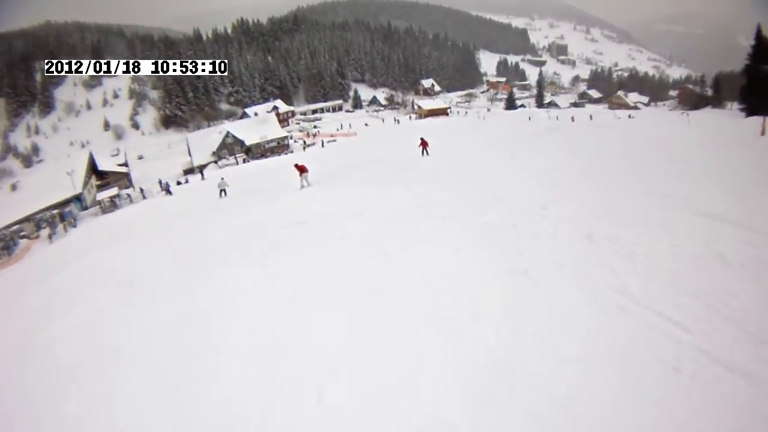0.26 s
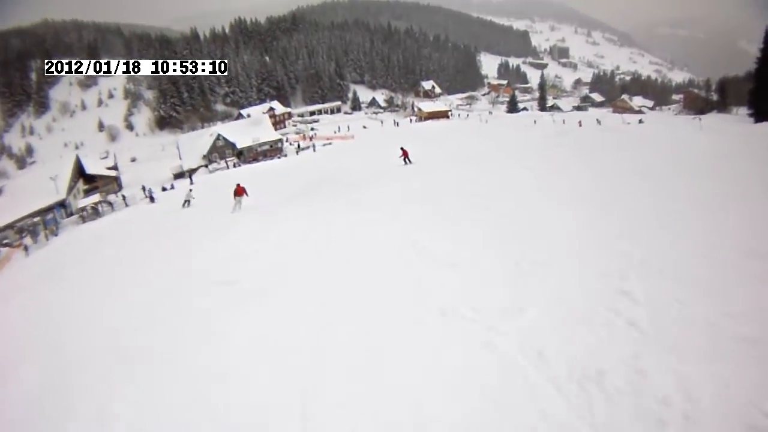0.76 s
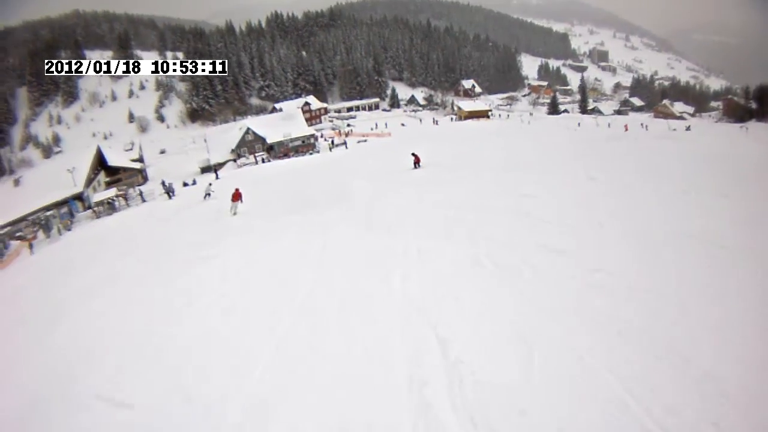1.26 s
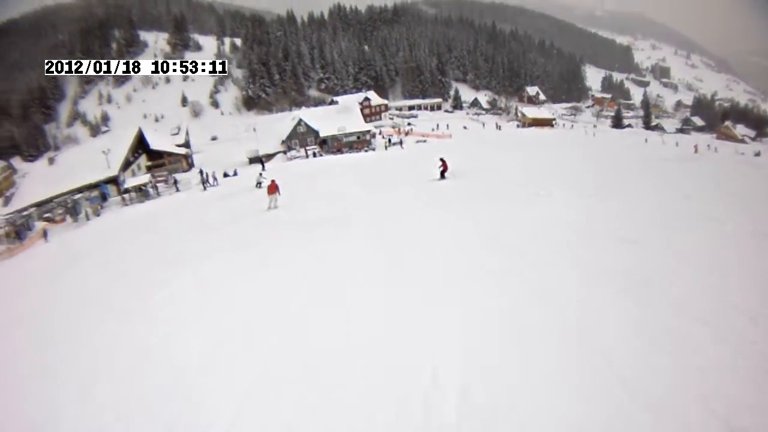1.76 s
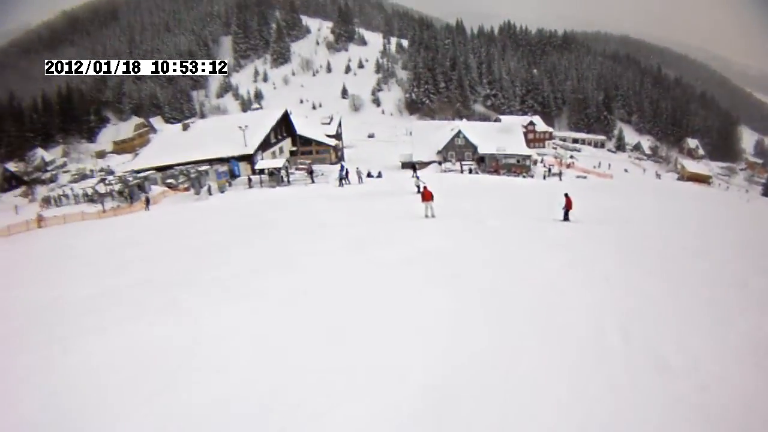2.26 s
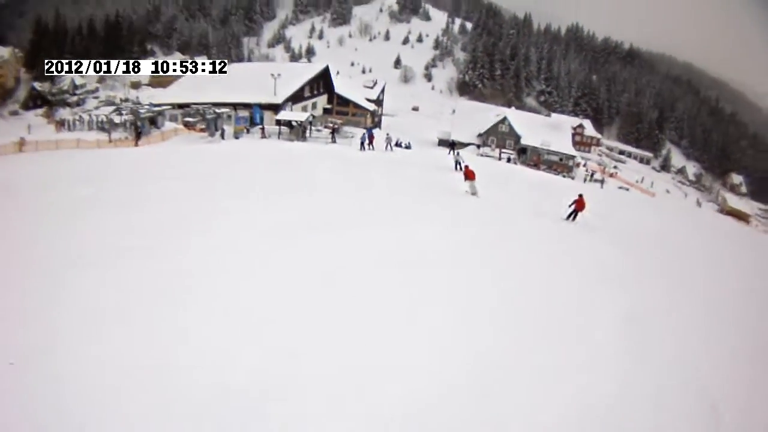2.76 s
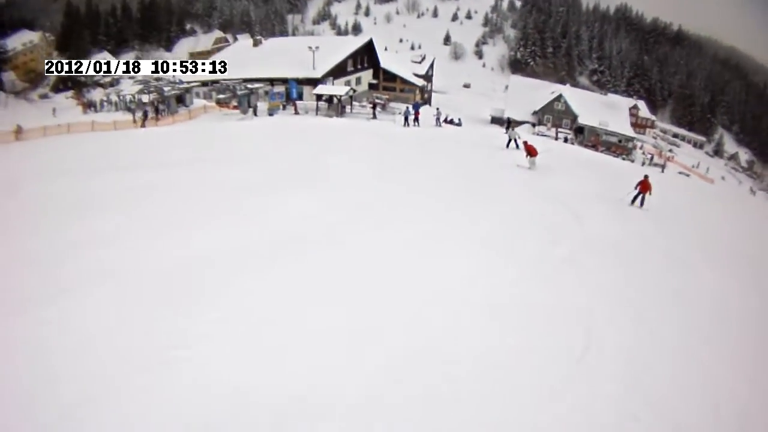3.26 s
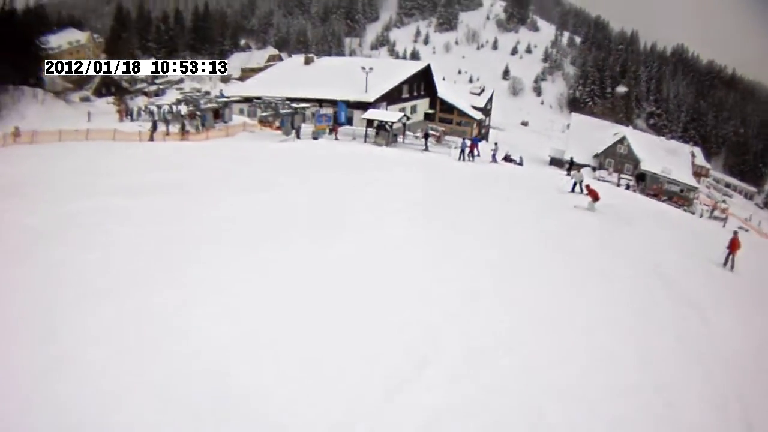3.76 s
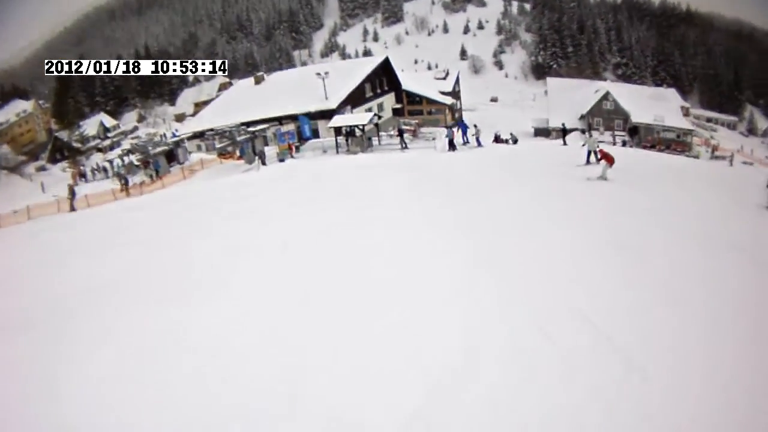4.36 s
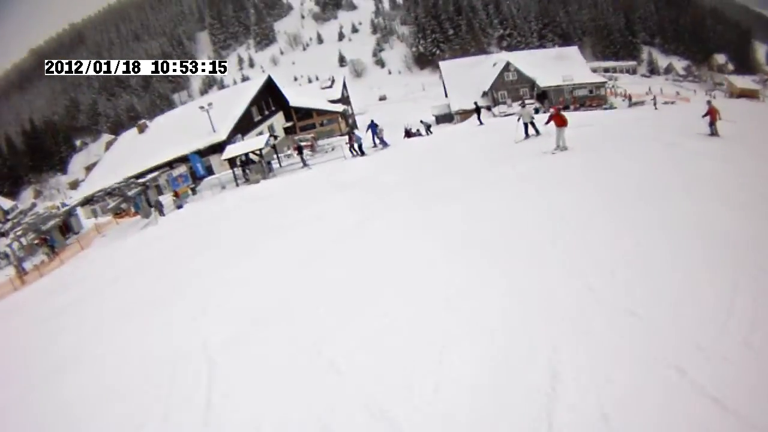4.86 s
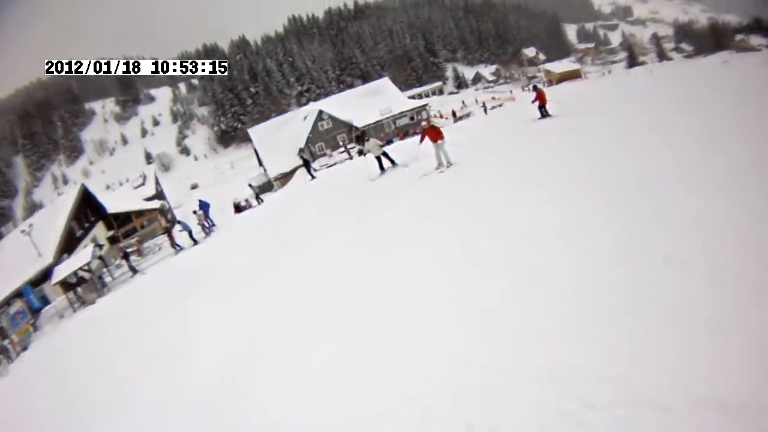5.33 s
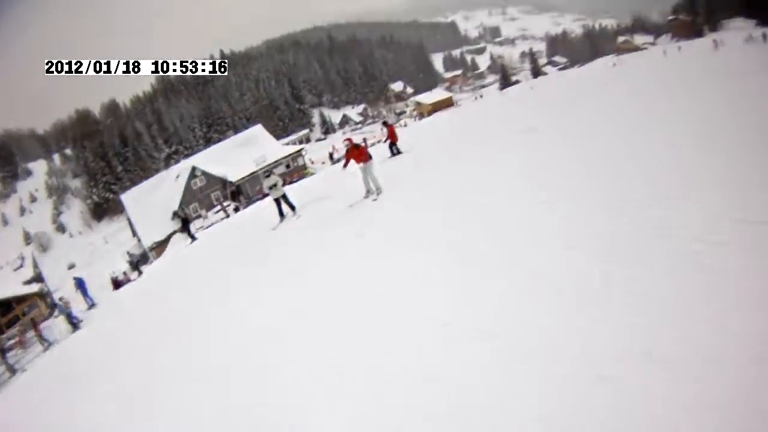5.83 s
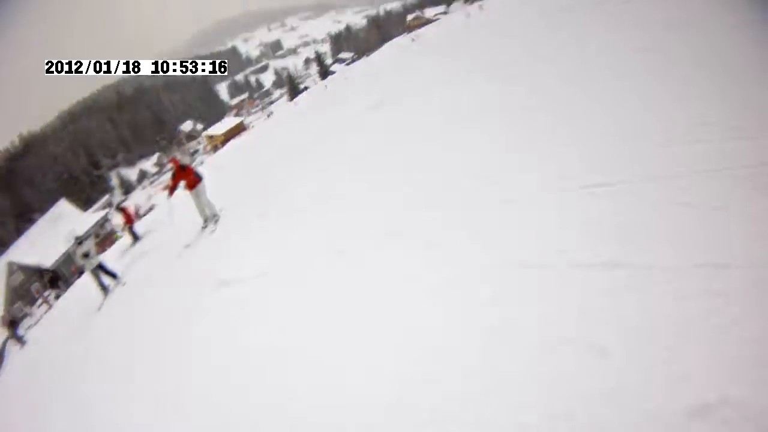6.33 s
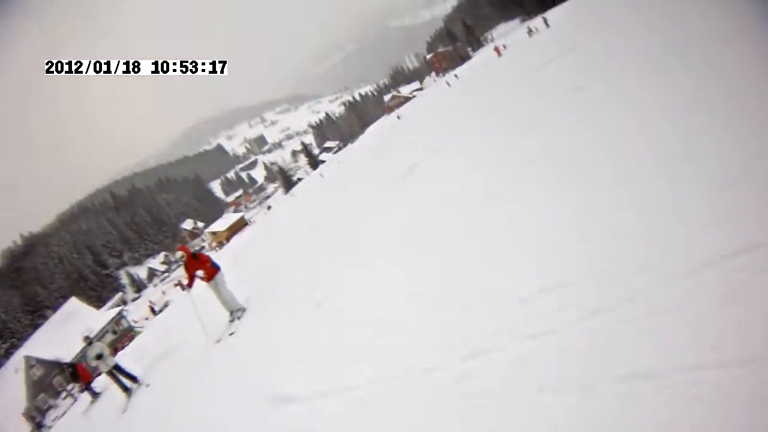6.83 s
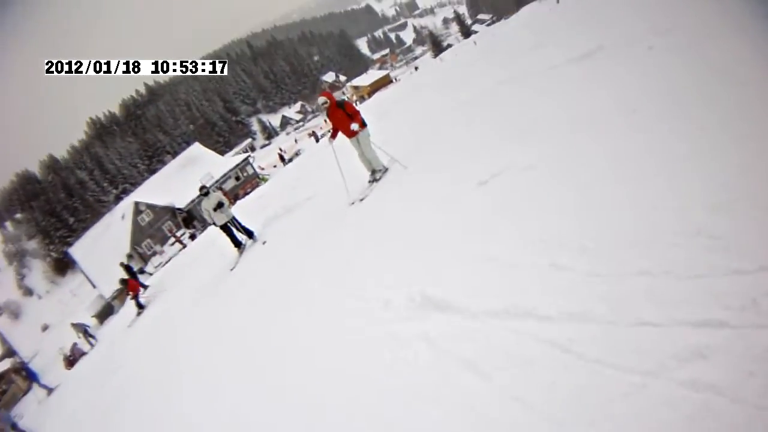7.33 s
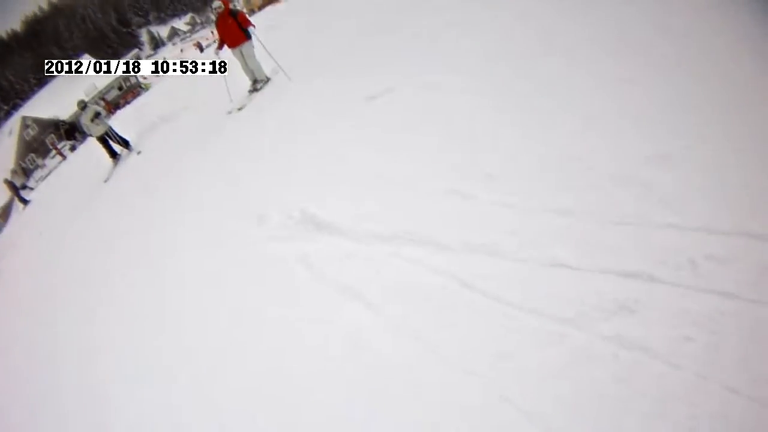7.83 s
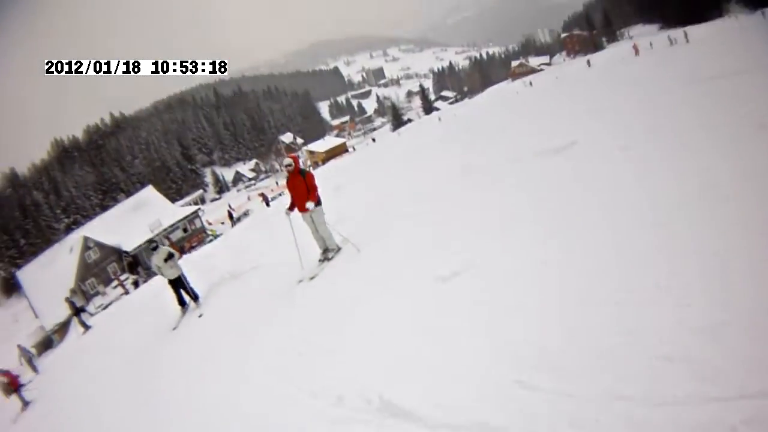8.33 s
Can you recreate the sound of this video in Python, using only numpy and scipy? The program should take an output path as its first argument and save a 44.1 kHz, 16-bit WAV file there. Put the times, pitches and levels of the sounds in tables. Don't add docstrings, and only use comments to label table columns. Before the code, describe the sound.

Skis carve fast over packed snow, heard close through a closed plastic case: dense chattering crackle in uneven bites over a hollow drone, with bright mount ticks and slight overload. Around four seconds they skid, breaking into sparse crunches, then shuffle on soft snow with a smooth thin hiss. After about seven and a half seconds they rest, leaving faint scuffs, tiny creaks and weak wind flutter outdoors.

```python
import sys
import numpy as np
from scipy import signal
from scipy.fft import rfft, irfft, next_fast_len
from scipy.io import wavfile
from scipy.ndimage import uniform_filter1d, map_coordinates

SR = 44100
rng = np.random.default_rng(int(sys.argv[2]) if len(sys.argv) > 2 else 0)


def wav_out(sig):
    wavfile.write(sys.argv[1], SR, np.round(np.clip(np.atleast_2d(sig).T, -1, 1) * 32767).astype(np.int16))


def undo_db(level):
    steps = np.asarray(level, float) / 20
    return 10 ** steps


N = 378819

# t/s, share of the fast colour [0-1]
SPEED = [(0, 0.94), (.35, 0.31), (.6, 0.71), (1.2, 0.53), (2, 0.88), (2.3, 0.47), (2.9, 0.67), (3.3, 0.52),
         (3.6, 0.17), (4.2, 0.34), (4.7, 0.38), (5.1, 0.1), (5.9, 0)]
# f/Hz, level/dB
CARVE_FAST = [(800, -50), (1300, -19.5), (2000, -19.5), (2700, -10), (3270, -0.5), (3800, -3), (4300, -6),
              (4700, 1.5), (4950, 2), (5200, -4), (5500, -7.5), (5800, -19), (6100, -22), (6400, -30.5),
              (7000, -33.5), (8000, -41.5), (11000, -73.5)]
CARVE_SLOW = [(700, -40.5), (1300, -23), (2000, -9.5), (2700, 1), (3270, 4), (3800, -1.5), (4300, -5),
              (4700, -6.5), (5000, -5.5), (5400, -12.5), (5700, -17), (5950, -26.5), (7000, -36),
              (11000, -46)]


def edges_carving():
    fast = np.clip(in_time(SPEED)[0], 0, 1.2)
    chatter = undo_db(0.36 * drift(48) + 0.79 * drift(230))
    per_s = 1800 + 3500 * fast
    crystals = rms_one(chatter) * crackle(per_s, spread_db=3.0, smooth=0.11)
    crystals = crystals * np.sqrt(per_s.mean() / per_s)
    bright, dull = colour(crystals, CARVE_FAST), colour(crystals, CARVE_SLOW)
    return undo_db(edge_db()) * (fast * bright + (1 - fast) * dull)


# start t/s, length/s, level at start/dB, level at end/dB
BITES = [(0, 0.2, -17, -17), (.475, 0.15, -18, -14.5), (.672, 0.17, -13.5, -14.5), (.9, 0.047, -16.5, -19),
         (1.03, 0.11, -17, -13.5), (1.18, 0.55, -21, -4.5), (1.35, 0.35, -21, -14.5),
         (1.73, 0.26, -16.5, -11.5), (2.03, 0.024, -27.5, -22.5), (2.092, 0.038, -21.5, -22),
         (2.17, 0.041, -17, -22), (2.25, 0.016, -23.5, -26.5), (2.36, .13, -22.5, -18.5),
         (2.512, 0.04, -14.5, -11.5), (2.635, 0.33, -17.5, -14), (2.95, .17, -15, -24),
         (3.14, 0.17, -20.5, -20.5), (3.42, .15, -25.5, -24), (3.61, 0.13, -28, -26.5),
         (3.75, 0.14, -26.5, -41.5), (3.89, .12, -35, -25.5), (4.138, 0.044, -35.5, -32),
         (4.2, .33, -26.5, -28.5), (4.55, .21, -28, -21.5), (4.78, 0.19, -26, -29.5),
         (5.0, 0.18, -39, -37.5), (5.26, 0.094, -46, -37.5), (5.41, 0.011, -40.5, -45),
         (5.492, 0.033, -42.5, -42), (5.575, 0.017, -44, -48)]
# t/s, level/dB
FLAT = [
    (0, -20),
    (.46, -21.5),
    (1.7, -15.5),
    (2.3, -25),
    (3.35, -30.5),
    (4.1, -40.5),
    (5.25, -50.5),
    (6.3, -62.5),
    (6.6, -74),
]
# t/s, peak level/dB
CRUNCHES = [(2.088, -7), (2.3595, -11), (2.5144, -8), (4.1395, -21), (4.147, -20), (4.1874, -21),
            (4.208, -12), (4.3221, -9), (4.4653, -20), (4.4867, -16), (4.5186, -17), (4.5625, -21.5),
            (4.6169, -17), (4.7032, -15), (4.8095, -14), (4.842, -9), (4.8665, -14), (4.9801, -19),
            (5.0094, -25), (5.0454, -26), (5.074, -21), (5.1074, -23), (5.1454, -22), (5.1694, -22),
            (5.2106, -23.5), (5.2729, -29), (5.2934, -24.5), (5.3393, -32), (5.3644, -26), (5.4106, -27),
            (5.4214, -38), (5.4964, -28), (5.5144, -31), (5.5747, -35)]
# t/s, half length/s, level change/dB
SKIPS = [(0.295, 0.0027, -8), (0.3502, 0.0026, -5), (0.421, 0.0033, -6), (0.4633, 0.0027, -8),
         (0.629, 0.0019, -8), (0.8355, 0.0016, -24), (1.1784, 0.0022, -2), (1.2413, 0.0036, -4),
         (1.582, 0.00076, -8), (1.6477, 0.0012, -16), (1.6685, 0.0018, -13), (1.781, 0.0013, -12),
         (1.96, 0.0014, -24), (2.0369, 0.0022, -10), (2.0775, 0.0039, -11), (2.157, 0.0041, -3),
         (2.305, 0.0048, -11), (2.354, 0.0052, -7), (2.4119, 0.0054, -5), (2.503, 0.0039, -5.5),
         (2.5813, 0.0025, 2), (2.6071, 0.0036, 0), (2.962, 0.0015, -12), (3.116, 0.0025, -6),
         (3.247, 0.0032, -5), (3.318, 0.0041, -2), (3.57, 0.0015, -8), (3.596, 0.0044, -3),
         (3.743, 0.0055, -7), (3.7836, 0.0038, -8), (3.812, 0.0015, -12), (3.86, 0.0035, -4),
         (3.9089, 0.0042, -8), (3.931, 0.0031, -8), (4.0533, 0.0025, -11), (4.122, 0.0046, -7),
         (4.1803, 0.0043, -3), (4.2159, 0.0027, -11), (4.461, 0.0023, -9), (4.4804, 0.0034, -10),
         (4.5064, 0.0013, -19), (4.525, 0.0011, -12), (4.61, 0.0036, -6), (4.6357, 0.0034, 0.5),
         (4.695, 0.0034, -6), (4.832, 0.0027, -9), (4.8632, 0.002, -8), (4.917, 0.0025, -9),
         (4.967, 0.0053, -9), (5.0023, 0.0047, -6), (5.027, 0.0057, -5), (5.0502, 0.0017, -18),
         (5.117, 0.0027, -11), (5.184, 0.0056, -8), (5.218, 0.0057, -5), (5.292, 0.0017, -11),
         (5.3842, 0.0023, -11), (5.406, 0.0062, -8), (5.487, 0.003, -8), (5.53, 0.0049, -8)]


def edge_db():
    power = undo_db(2 * strokes(BITES, in_time(FLAT)[0]))
    t = np.arange(1024) / SR
    for s, db in CRUNCHES:
        at = round(s * SR)
        power[at:at + 1024] += undo_db(2 * (db - 13)) * np.exp(-t / 0.0037)
    level_db = 10 * np.log10(power)
    for s, half_s, db in SKIPS:
        at = round(s * SR)
        level_db[at - 512:at + 512] += db * np.exp(-((t - 512 / SR) / half_s) ** 4)
    return level_db


# f/Hz, level/dB
SHUFFLE_TONE = [(1300, -22), (2050, -18), (2270, -5), (2480, -5.5), (2720, 1.5), (2950, -8), (3280, 0),
                (4050, -7.5), (4600, -4.5), (5030, -0.5), (5400, -4.5), (6100, -13), (7000, -20),
                (7900, -31)]
# f/Hz, width/Hz, level under the hiss/dB
CASE_SINGS = [
    (1190, 140, -11),
    (2752, 130, -12),
    (5010, 470, -8.5),
]


def shuffling():
    level_db = slide_db()
    fade = np.clip((np.arange(N) / SR - 5.5) / 0.14, 0, 1)
    hiss = colour(crackle(per_s=5300, spread_db=4.0, smooth=1.0), SHUFFLE_TONE)
    brisk_db, growth = -45.5, 0.88
    for hz, width_hz, db in CASE_SINGS:
        mode_db = db + growth * (level_db - brisk_db) + 2.0 * drift(10)
        hiss = hiss + undo_db(mode_db) * band(hz - width_hz / 2, hz + width_hz / 2)
    hiss = hiss.std() * patchy(hiss, depth_db=1.4, patch_hz=500, patch_s=.04)
    return fade * undo_db(level_db + 0.82 * drift(32)) * hiss


# t/s, level/dB
SHUFFLE = [
    (5.0, -61),
    (5.55, -48),
    (5.8, -54.5),
    (6.0, -51.5),
    (6.35, -55.5),
    (6.86, -43),
    (7.1, -49.5),
    (7.25, -51),
    (7.4, -66.5),
    (8.59, -69),
]
# start t/s, length/s, level at start/dB, level at end/dB
SCUFFS = [
    (5.58, 0.025, -48, -61),
    (6.595, 0.015, -47, -41.5),
    (6.63, 0.09, -56, -60),
    (7.13, 0.093, -48.5, -52),
    (7.7, 0.125, -72, -68),
    (7.79, 0.0604, -70, -65),
    (7.86, 0.26, -60, -69.5),
    (8.45, 0.053, -62, -62),
]


def slide_db():
    return strokes(SCUFFS, in_time(SHUFFLE, outside_db=-86)[0])


# t/s, level/dB
GLIDE = [(0, -38), (2, -37), (3, -39), (3.45, -41.5), (4.1, -44.5), (4.9, -42), (5.05, -47), (5.6, -50.5),
         (5.76, -51), (6.22, -56.5), (6.84, -55.5), (7.24, -55), (7.4, -67), (8.59, -69.5)]
# start t/s, length/s, level at start/dB, level at end/dB
SHIFTS = [(1.04, 0.075, -40, -43), (2.165, 0.017, -31, -47), (6.6, .02, -47, -61), (5.65, 0.041, -59, -48),
          (7.63, .15, -63.5, -62.5), (7.8, 0.3, -65, -73), (8.172, 0.089, -64, -67.5),
          (8.447, 0.16, -59, -71)]
# t/s, state [0 fast, 1 skidding sideways, 2 slow]
DRONE_STATE = [
    (3.95, 0),
    (4.2, 1),
    (5.0, 1),
    (5.9, 2),
]
# f/Hz, level/dB
DRONE_FAST = [(250, -50), (420, -38), (560, -20.5), (700, -16.5), (830, -11), (1010, -6), (1200, -9),
              (1450, -7), (1930, -9.5), (2200, -3.5), (2800, -27.5), (4600, -101)]
DRONE_SKID = [(240, -47), (400, -28), (506, -19.5), (611, -7.5), (784, -8), (979, -4.5), (1210, -4.5),
              (1470, 0), (1740, -2.5), (2100, -2.5), (2730, -5), (4620, -120)]
DRONE_SLOW = [(240, -37), (400, -18), (620, -12.5), (785, -5.5), (900, -9), (1060, -3), (1200, -4.5),
              (1370, -8), (1620, -3), (1800, -8.5), (1980, -13.5), (2300, -14), (4600, -99)]
# f/Hz, level/dB
SPRAY_TONE = [(4000, -29.5), (5800, 1), (6500, 2), (7000, 8), (7500, 0), (7750, 1.5), (8500, -1),
              (9600, -1), (10700, -1.5), (12000, -16)]


def skis_gliding():
    edges, fast = edge_db(), in_time(SPEED)[0]
    swing_db = edges - uniform_filter1d(edges, size=30000)
    drone_db = strokes(SHIFTS, in_time(GLIDE)[0] + 0.23 * swing_db)
    drone_db = uniform_filter1d(drone_db, size=2500)
    state, = in_time(DRONE_STATE)
    skid = np.minimum(state, 1)
    rub = crackle(per_s=2500, spread_db=2.5, smooth=1.2)
    drone = np.zeros(N)
    for k, tone in enumerate((DRONE_FAST, DRONE_SKID, DRONE_SLOW)):
        drone += np.clip(1 - np.abs(state - k), 0, 1) * colour(rub, tone)

    mode_hz, width_hz = 1022.6, 77
    late = np.arange(N) / SR - 2.1
    mode_db = -8 + np.where(late < 0, 4 * late, -7 * late)
    mode = band(mode_hz - width_hz / 2, mode_hz + width_hz / 2)
    drone = drone + undo_db(mode_db - 18 * skid) * mode

    thrown_db = -51.5 + 0.61 * edges + 9 * fast - 18 * skid
    slow_db = -28.5 + 0.75 * slide_db()
    spray = np.hypot(undo_db(thrown_db), undo_db(slow_db))
    dust = undo_db(1.6 * drift(30) + 2.0 * drift(90)) * crackle(per_s=284, spread_db=8.5, smooth=2.65)
    return undo_db(drone_db + 1.18 + 0.91 * drift(20)) * drone + spray * colour(dust, SPRAY_TONE)


# t/s, peak level/dB, f/Hz
KNOCKS = [(5.0434, -28, 3390), (5.13, -35, 2980), (5.31, -33, 1490), (5.4621, -42, 1520),
          (5.7312, -31.5, 1520), (5.819, -36.5, 1520), (6.2842, -41, 3290), (6.4383, -45, 1300),
          (6.472, -37.5, 1260), (6.5883, -47, 2780), (6.672, -38, 2780), (7.1162, -43, 1180),
          (7.1445, -43, 1168), (7.8594, -42, 3230), (3.9502, -25.5, 5500), (3.9502, -49, 447),
          (8.132, -52, 5500), (3.815, -34, 5500), (3.815, -31, 1500), (8.48, -52, 4810), (8.485, -52, 2600),
          (8.135, -57, 2600), (7.875, -55, 5000)]
# t/s, peak level/dB, f/Hz
CRUMBS = [(5.74, -38, 5340), (5.8208, -39, 3220), (5.8553, -35, 3230), (5.8897, -40, 3290),
          (5.9136, -34, 2690), (6.0044, -30, 4830), (6.1157, -36, 3280), (6.2588, -39, 3280),
          (6.2833, -41, 3310), (6.4823, -36, 2730), (6.5866, -35, 2750), (6.6035, -35, 2720),
          (6.674, -29, 5030), (6.8475, -28, 2720), (6.9473, -36, 2730), (7.1144, -40, 5020)]


def crust_knocks():
    lumps = bursts(KNOCKS, length_s=0.004, width=1.097, lift_db=-0.5)
    return lumps + bursts(CRUMBS, length_s=0.0022, width=1.2, lift_db=-4.5)


# t/s, peak level/dB
TICKS = [(0.142, -25), (0.159, -31), (0.405, -41), (0.5162, -40), (0.6644, -37), (1.7065, -34.5),
         (1.9809, -30), (2.1595, -39), (2.434, -37), (2.614, -35.5), (2.831, -39), (3.0145, -32),
         (3.0724, -38), (3.252, -39.5), (3.2859, -37.5), (3.4466, -38), (3.8975, -50), (3.961, -39),
         (4.071, -47), (4.097, -48), (3.806, -42), (3.98, -43), (4.142, -48), (0.7572, -30), (0.807, -25.5),
         (0.922, -32), (1.0914, -28.5), (1.1363, -35.5), (1.3294, -29), (1.373, -32.5), (1.4726, -29.5),
         (1.5653, -34.5), (1.6189, -40), (1.6472, -36), (1.7902, -38), (1.8612, -43), (1.9535, -25.5),
         (2.301, -35), (2.466, -33.5), (2.5147, -31.5), (2.67, -34), (2.8497, -33.5), (2.8967, -25),
         (2.974, -23), (3.039, -28.5), (3.1403, -37), (3.401, -35), (3.4657, -38), (3.815, -27.5),
         (3.9504, -22.5), (4.108, -35), (4.592, -44)]
# from t/s, to t/s, peak level/dB
RATTLES = [
    (0, 3.6, -42),
    (2.9, 4.0, -47),
    (4.2, 5.2, -49),
    (5.75, 6.8, -47),
]


def mount_ticks():
    ticks = [(s, db, 8300) for s, db in TICKS]
    for start_s, end_s, db in RATTLES:
        for when, weak in rng.random((14, 2)):
            ticks.append((start_s + (end_s - start_s) * when, db - 8.0 * weak, 8300))
    return bursts(ticks, length_s=0.0013, width=1.7, lift_db=3.0)


# t/s, peak level/dB
CREAKS = [(4.0557, -46), (4.06, -47), (4.0881, -45), (4.4004, -49), (4.8389, -58), (5.1901, -46),
          (5.2044, -47), (5.246, -40), (5.2809, -47), (5.3093, -42), (5.3248, -46), (5.5084, -52),
          (5.5752, -28), (5.583, -38), (5.673, -45), (5.7159, -36), (5.8656, -49), (5.905, -43),
          (5.946, -36.5), (5.9873, -42), (6.3495, -41), (6.492, -45), (6.8179, -45), (7.0233, -32),
          (7.3167, -50), (7.448, -48), (7.5058, -55), (7.7433, -58), (8.1324, -55), (8.3699, -57),
          (8.4873, -57)]


def mount_creaks():
    return bursts([(s, db, 8500) for s, db in CREAKS], length_s=.002, width=1.6, lift_db=3.5)


# t/s, level/dB
AIR = [(0, -60.5), (1.9, -59), (2.3, -57), (2.7, -55), (3.3, -60), (4.2, -67), (5.1, -65), (5.5, -63.5),
       (6.3, -69), (7.3, -72.5), (8.59, -77)]
# t/s, half length/s, buffet level/dB, throb level/dB
GUSTS = [(.29, 0.062, -58, -72), (.95, 0.13, -70, -63), (2.16, 0.056, -62, -48.5), (2.287, 0.07, -53, -57),
         (2.47, 0.069, -61, -53), (2.663, 0.12, -44.5, -61), (2.848, 0.54, -53.5, -53.5),
         (3.45, 0.21, -60, -64), (3.87, 0.15, -56, -72), (4.35, 0.29, -60, -71), (4.896, 0.11, -61, -76),
         (5.423, 0.073, -51, -65), (5.717, 0.11, -47.5, -102), (5.955, .04, -51, -81),
         (6.12, 0.11, -55, -81), (6.71, 0.089, -54, -74), (6.95, 0.11, -59, -81), (7.195, 0.18, -60.5, -80),
         (8.002, .35, -65, -78), (8.502, 0.11, -70.5, -73)]
# f/Hz, level/dB
FLUTTER_TONE = [(76, -26), (130, -3), (188, -1), (242, 2), (296, 0), (447, -3.5), (520, -6), (680, -32),
                (1140, -120)]


def wind():
    flutter_db, = in_time(AIR)
    t = np.arange(N) / SR
    buffet, throb = undo_db(flutter_db - 2.5), undo_db(flutter_db - 5.5)
    for s, half_s, buffet_db, throb_db in GUSTS:
        swell = np.exp(-((t - s) / half_s) ** 2)
        buffet = np.hypot(buffet, undo_db(buffet_db) * swell)
        throb = np.hypot(throb, undo_db(throb_db) * swell)
    flutter = colour(rng.standard_normal(N), FLUTTER_TONE)
    low = undo_db(2.2) * buffet * evened(band(8, 31)) + throb * band(58, 120)
    return low + undo_db(flutter_db + 0.99 * drift(8)) * flutter


def rms_one(x):
    return x / np.sqrt(np.mean(x ** 2) + 1e-20)


def in_time(rows, outside_db=None):
    s, *columns = np.transpose(rows)
    return [np.interp(np.arange(N) / SR, s, c, outside_db, outside_db) for c in columns]


def strokes(rows, under_db):
    t, power = np.arange(N) / SR, undo_db(2 * under_db)
    for s, length_s, start_db, end_db in rows:
        near = slice(max(round((s - .2) * SR), 0), round((s + length_s + .2) * SR))
        late = t[near] - s
        db = np.interp(late, [0, max(length_s, 1e-3)], [start_db, end_db])
        db = db - 1002 * np.maximum(-late, 0)
        db = db - 600.5 * np.maximum(late - length_s, 0)
        power[near] += undo_db(2 * db)
    return 10 * np.log10(power)


def drift(rate):
    r = np.exp(-40 * np.pi * rate / SR)
    noise = rng.standard_normal(N // 20 + 4002)
    slow = signal.lfilter([1], [1, -2 * r, r * r], noise)[4000:]
    return np.interp(np.arange(N) / 20, np.arange(len(slow)), rms_one(slow))


def crackle(per_s, spread_db, smooth):
    sizes = undo_db(spread_db * np.minimum(rng.exponential(1, N), 4)) * rng.choice([-1, 1], N)
    clicks = rms_one(sizes * (rng.random(N) < per_s / SR))
    return clicks + smooth * rng.standard_normal(N)


def colour(x, spectrum):
    hz, db = np.transpose(spectrum)
    grid = np.arange(4097) * SR / 8192 + 1
    cepstrum = irfft(np.log(undo_db(np.interp(np.log(grid), np.log(hz), db))))
    cepstrum[1:4096] *= 2
    cepstrum[4097:] = 0
    return rms_one(signal.fftconvolve(x, irfft(np.exp(rfft(cepstrum))))[:N])


def band(low_hz, high_hz):
    sos = signal.butter(3, [low_hz, high_hz], "band", fs=SR, output="sos")
    return rms_one(signal.sosfilt(sos, rng.standard_normal(N)))


def bursts(events, length_s, width, lift_db):
    out, t = np.zeros(N + 2048), np.arange(1024) / SR
    for s, db, hz in events:
        puff = rng.standard_normal(1024) * np.exp(-t / length_s)
        edges = np.clip([hz / width, hz * width], 50, .45 * SR)
        puff = signal.sosfilt(signal.butter(2, edges, "band", fs=SR, output="sos"), puff)
        at = round(s * SR)
        out[at:at + 1024] += undo_db(db + lift_db) * puff / np.abs(puff).max()
    return out[:N]


def patchy(x, depth_db, patch_hz, patch_s):
    hz, t, cells = signal.stft(x, SR, nperseg=256)
    places = np.meshgrid(hz / patch_hz, t / patch_s, indexing="ij")
    field = map_coordinates(rng.standard_normal((128, 2048)), places, order=1, mode="wrap")
    cells = cells * undo_db(depth_db * rms_one(field))
    return rms_one(signal.istft(cells, SR, nperseg=256)[1][:N])


def evened(x):
    return rms_one(x / np.sqrt(uniform_filter1d(x ** 2, size=3000) + .1))


def scene():
    skis = edges_carving() + shuffling() + skis_gliding() + crust_knocks()
    return (skis + mount_ticks() + mount_creaks() + wind())[None]


def limiter(x):
    envelope = np.abs(signal.hilbert(x, next_fast_len(N))[:, :N])
    height = uniform_filter1d(envelope, size=15) / .75 + 1e-9
    x = x / (1 + height ** 4) ** .25
    keep = np.exp(-1 / (.002 * SR))
    excess = uniform_filter1d(np.maximum(np.abs(x) - .5, 0), size=25)
    sag = signal.lfilter(np.r_[np.zeros(20), 1], [1, -keep], excess) / 10
    return x * undo_db(-35 * sag)


# low f/Hz, high f/Hz, share of blocks [0-1]
DROPPED = [(2900, 3350, .1), (5150, 5800, .15), (5800, 7000, .06), (7000, 8300, .08), (8300, 9600, .1),
           (9600, 11200, .1)]


def band_dropouts(x):
    size, block = next_fast_len(N), 160
    spectrum, hz = rfft(x, size), np.fft.rfftfreq(size, 1 / SR)
    for low_hz, high_hz, share in DROPPED:
        inside = np.clip(np.minimum(hz - low_hz, high_hz - hz) / 200 + .5, 0, 1)
        part = irfft(spectrum * inside, size)[:, :N]
        blank = np.repeat(rng.random(N // block + 1) < share, block)[:N] * 1.0
        x = x - part * uniform_filter1d(blank, size=block // 3)
    return x


# t/s, peak level/dB
OVERLOADS = [(0.0005, -30.5), (0.1775, -63), (0.7764, -47), (0.8076, -31), (1.0859, -46.5), (1.0925, -39),
             (1.1363, -37.5), (1.3294, -44), (1.348, -36.5), (1.3757, -44.5), (1.4192, -36.5), (1.495, -52),
             (1.6013, -50.5), (1.6177, -29.5), (1.6721, -48), (1.7417, -44.5), (1.789, -39.5),
             (1.8432, -50), (1.8618, -29.5), (1.9286, -47), (1.9547, -31), (2.5377, -50.5), (2.8489, -42.5),
             (2.9128, -46)]


def overload(x):
    s, db = np.transpose(OVERLOADS)
    at = np.round(s * SR).astype(int) + 8
    x[0, at] -= np.sign(x[0, at]) * undo_db(db + 17.5)
    return x


def roll_off(x):
    return signal.sosfilt(signal.butter(12, 15830, fs=SR, output="sos"), x)


def record(dry):
    x = limiter(dry + undo_db(-77.5) * band(5000, 12000))
    half_rate = signal.ellip(10, .3, 66, 11060, fs=SR, output="sos")
    x = overload(signal.sosfilt(half_rate, band_dropouts(x)))
    return roll_off(x)


dry = scene()
out = record(dry)
wav_out(out)
```